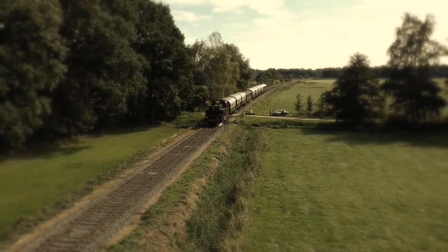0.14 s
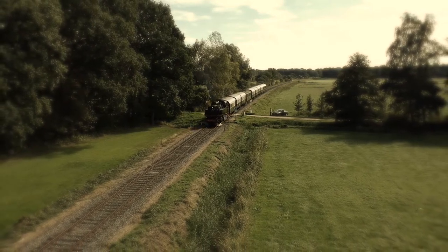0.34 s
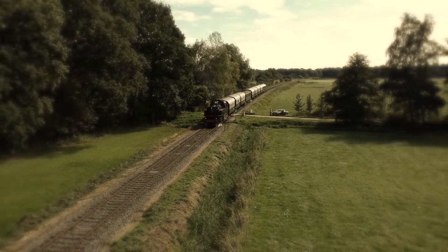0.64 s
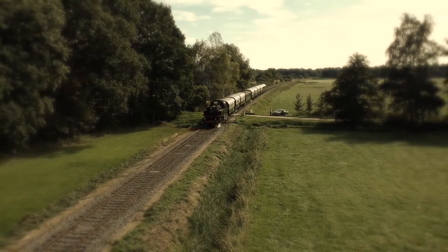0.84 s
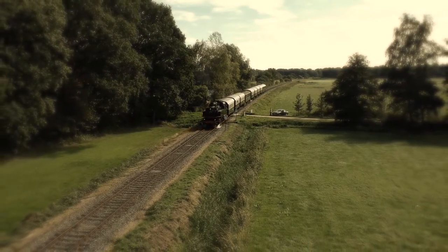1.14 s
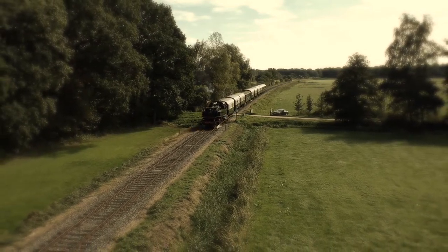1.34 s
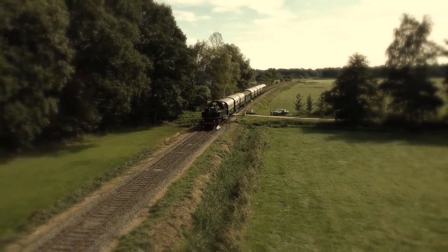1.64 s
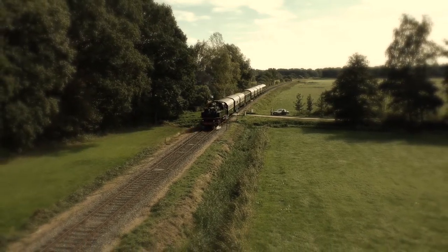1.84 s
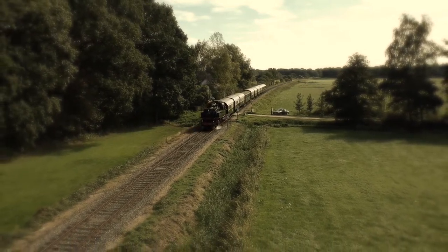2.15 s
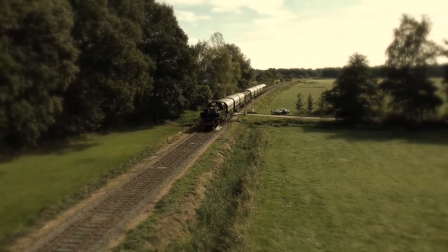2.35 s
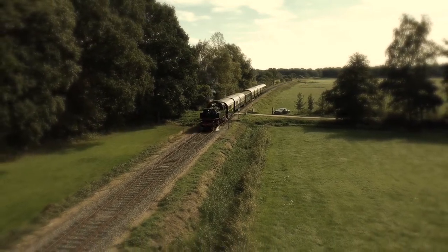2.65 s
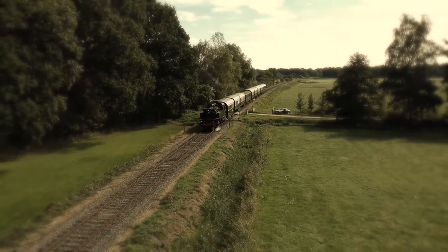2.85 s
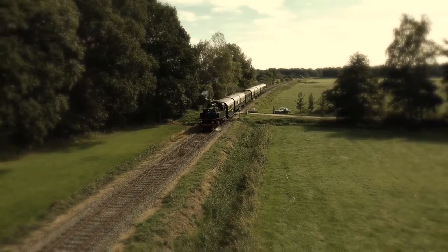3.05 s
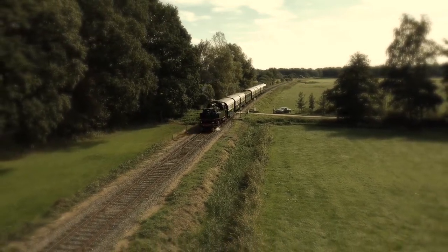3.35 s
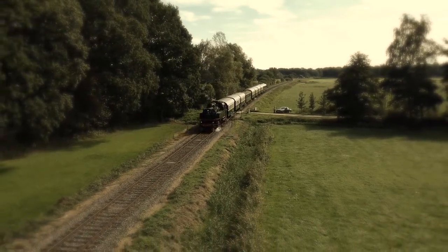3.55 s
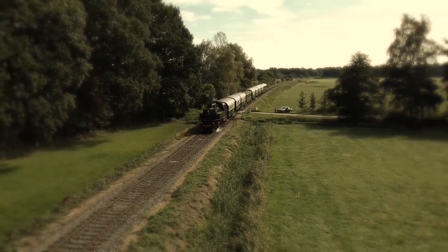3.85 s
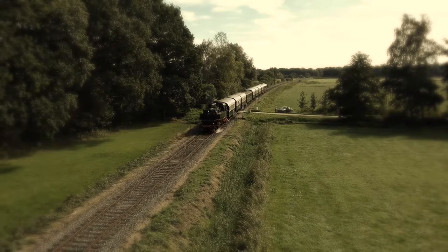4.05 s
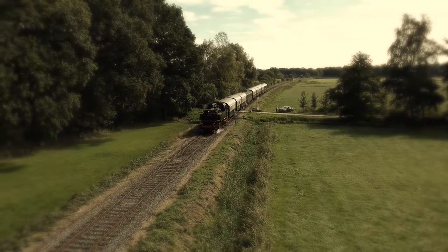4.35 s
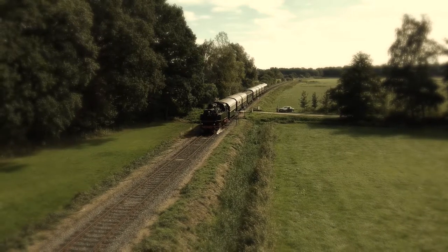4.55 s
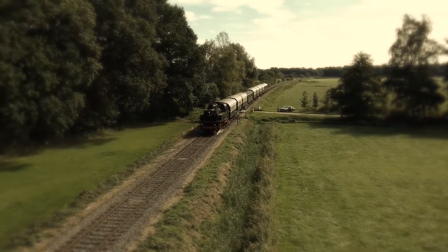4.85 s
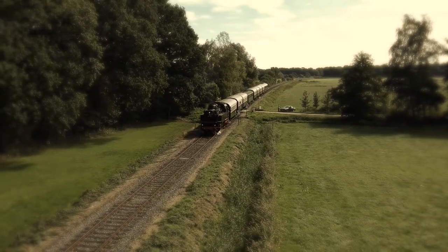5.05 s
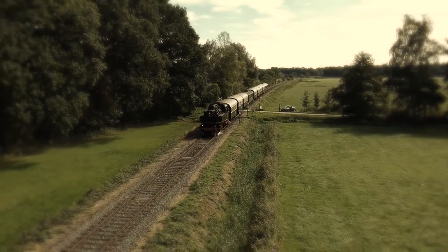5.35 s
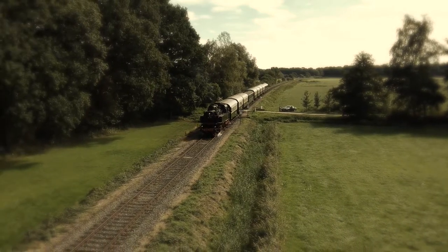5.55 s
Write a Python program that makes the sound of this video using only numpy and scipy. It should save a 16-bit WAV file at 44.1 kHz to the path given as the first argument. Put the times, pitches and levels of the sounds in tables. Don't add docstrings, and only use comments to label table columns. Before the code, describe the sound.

Steam engine already at speed from the start, outdoors with no room echo. Fast exhaust beats, slightly uneven in strength, ride over continuous airy hiss and low uneven rumble. The engine gradually grows fuller and closer over several seconds, with faint metallic wheel ringing. Stereo is wide, the left side later and duller; a phasey sweep resets abruptly near the end.

```python
import sys
import numpy as np
from scipy import signal
from scipy.fft import rfft, irfft, next_fast_len
from scipy.io import wavfile
from scipy.ndimage import uniform_filter1d, map_coordinates

SR = 44100
rng = np.random.default_rng(int(sys.argv[2]) if len(sys.argv) > 2 else 0)


def ratio_of_db(decibels):
    return 10 ** (np.asarray(decibels, float) / 20)


def dump(signal):
    limited = np.clip(np.atleast_2d(signal).T, -1, 1)
    pcm = np.round(limited * 32767).astype(np.int16)
    wavfile.write(sys.argv[1], SR, pcm)


N = 251811
T = np.arange(N) / SR

# time in seconds, nearness in dB, depth of the exhaust in dB,
# boom left minus right in dB, bark left minus right in dB.
COURSE = [(0.0, -3.5, -5, 12, -2.5), (0.45, -3, 0.5, 0, -10), (0.8, -2.5, -3.5, 0.5, -5.5),
          (1.3, -1, -9.5, 11, -6), (1.7, -1.3, -0.5, 6, -6), (2.3, 1.4, -5, 5, -5), (2.8, 0.7, 6, 2.5, -5),
          (3.3, 1.45, 5.5, -2.5, -7), (3.9, -0.2, 8, -1, -7.5), (4.4, 1.4, 6, -5.5, -8.5),
          (5.0, 3.5, 6, -5, -7.5), (5.3, 3, -2, -9, -2), (5.71, 2.5, -12, -1, -7)]


def chimney():
    # frequency in Hz, level in dB per Hz.
    boom_tone = [(50, -49), (80, 2), (105, -16), (122, 3), (140, 0), (165, -2.5), (200, -7.5), (260, -24)]
    bark_tone = [(150, -10), (220, -7), (300, 3), (360, -3), (430, 0.5), (520, -4), (600, -8), (800, -27)]
    roar_tone = [(450, -1), (600, 1.5), (900, 1.5), (1200, -3.5), (1500, -8), (1900, -25.5)]
    rasp_tone = [(1100, -47), (1500, 0.5), (2300, 1.5), (3300, -5), (4500, -4), (7000, -48)]
    # time in seconds, centre in Hz, level in dB, length in
    # seconds.
    spurts = [(0.615, 2300, -42, 0.025), (0.79, 2300, -38, 0.025), (1.285, 2250, -34, 0.03),
              (1.435, 2300, -34, 0.022), (2.33, 1750, -35, 0.019), (4.256, 1550, -35.5, 0.044),
              (4.9, 1700, -37, 0.045), (4.632, 13000, -35, .002)]
    flutter = flicker(45, 2.05)
    layers = []
    for layer, tone in enumerate((boom_tone, bark_tone, roar_tone, rasp_tone)):
        layers.append(puffs(layer) * colour(noise(), tone))
    boom, *upper = layers
    body = flutter * patchy(sum(upper), [451, 850, 1493, 2510], 30, 1.54)
    for s, hz, db, length in spurts:
        band = signal.butter(2, [hz / 1.24, hz * 1.21], "band", fs=SR)
        spurt = signal.lfilter(*band, noise())
        body = body + ratio_of_db(db) * np.exp(-((T - s) / length) ** 2) * spurt / np.std(spurt)
    return boom, body


def puffs(layer, extra_db=0):
    # delay, rise and fall in seconds.
    shapes = [(-0.00026, 0.015, 0.032), (-0.018, 0.015, 0.052), (-0.011, 0.017, 0.035),
              (-0.014, 0.014, 0.047), (-0.0088, 0.029, 0.029)]
    # level in dB of blasts 1, 2, 3 and 4.
    voices = [(-23, -23.5, -23.5, -28), (-26, -26.5, -27, -25.5), (-28, -28, -29, -28.5),
              (-33, -34.5, -35.5, -37), (-20, -23, -24.5, -28.5)]
    # dB per dB of strength, of nearness and of depth.
    answers = [(0.5, 0.4, 1), (0.98, 0.26, 0.1149), (1, -0.23, -0.03), (0.72, -0.1, 0.11),
               (-0.11, 0.85, -0.21)]
    tail_db, tail_s = -10, 0.02
    delay, rise, fall = shapes[layer]
    times, beat, strength = blasts()
    nearness, depth = curves(COURSE, times)[:2]
    answer_db = np.dot(answers[layer], [strength, nearness, depth])
    levels_db = extra_db + np.array(voices[layer])[beat] + answer_db
    power = np.zeros(N)
    for s, db in zip(times, levels_db):
        around = slice(max(int((s - .12) * SR), 0), max(int((s + .3) * SR), 0))
        u = T[around] - s - delay
        swell = np.exp(-(u / np.where(u < 0, rise, fall)) ** 2)
        tail = ratio_of_db(2 * tail_db) * (u > 0) * u / tail_s * np.exp(1 - np.abs(u) / tail_s)
        power[around] += ratio_of_db(2 * db) * (swell + tail)
    return np.sqrt(power)


def blasts():
    # start in seconds, strength in dB of blasts 1, 2, 3 and 4.
    turns = [(-0.362, 3, 0.1, -5.5, -7.5), (0.302, -3, -2.5, -1, -4), (0.964, 0, -2.5, 0.7, -1.3),
             (1.621, 0.1, -0.3, 0.1, -3), (2.281, 0.5, -0.3, -1, -1.6), (2.922, -1, -1.5, 0.4, -0.2),
             (3.568, 1, -1.6, 1, -2), (4.212, 3, 0.4, 1.3, -0.4), (4.846, 1.8, 1.6, 2.1, 1.4),
             (5.496, 1.5, 1.5, 0.1, 0.1)]
    beats = np.array([0, .26, .494, .74])
    start, *strength = np.transpose(turns)
    length = np.diff(start)
    length = np.append(length, length[-1])
    times = start[:, None] + length[:, None] * np.array(beats)
    return times.ravel(), np.tile(np.arange(4), len(start)), np.transpose(strength).ravel()


def jets(main, far_db, share=0.32):
    # frequency in Hz, level in dB per Hz.
    tones = [
        [(2500, -16), (3500, -9.5), (5000, -10), (7000, -5), (9000, 1.5), (11000, -1), (13000, -6.5), (15500, -24)],
        [(2500, -14), (3500, -13), (5000, -6), (6500, -1), (7800, 2.5), (9500, -1), (12000, -9), (15500, -22.5)],
    ]
    # dB on blasts 1, 2, 3 and 4.
    jet_extra = [(0.1, 0.1, -3, 3), (-0.5, 2.5, 0.5, 0), (-2.5, -1, -0.7, 2), (0.1, 0.8, -1.5, 3),
                 (0, -0.6, 2.5, 1.5), (-1.8, 0.5, 1.5, 5.3), (-2, 1, 1.5, 2), (-0.5, 3.2, 2, 1),
                 (1.3, 0, -1, 4), (-2.5, -1.3, 0.1, 0.1)]
    common, spit = noise(), flicker(45, 1.5)
    burst = ratio_of_db(-0.5) * puffs(layer=4, extra_db=np.ravel(jet_extra))
    right_db, left_db = lull(row=1), lull(row=2)
    left_push = late(spit * np.hypot(ratio_of_db(left_db), ratio_of_db(far_db) * burst), main)
    right_push = spit * np.hypot(ratio_of_db(right_db), burst)
    sides = []
    for shared, push, tone in zip((late(common, main), common), (left_push, right_push), tones):
        steam = colour(np.sqrt(share) * shared + np.sqrt(1 - share) * noise(), tone)
        sides.append(push * patchy(steam, [5000, 7500, 10500], 40, 1.17))
    return np.array(sides)


def motion():
    # frequency in Hz, level in dB per Hz.
    gear_tone = [(150, 41), (220, -26), (300, -1), (480, -0.5), (720, 3), (1000, 11.5), (1400, 5.5),
                 (2200, 6), (3300, -1), (5000, -52)]
    # frequency in Hz, width in Hz, level in dB.
    rims = [(300, 25, -48), (1175, 25, -63), (1510, 20, -64), (1962, 20, -64), (2260, 20, -59),
            (3316, 14, -58)]
    rolling = ratio_of_db(lull(row=0)) * patchy(colour(noise(), gear_tone), [500, 1500], 16, 2.6)
    approach = ratio_of_db(1.5 * (T - 3))
    for hz, width, db in rims:
        ring = signal.lfilter(*signal.iirpeak(hz, hz / width, SR), noise())
        rolling = rolling + approach * ratio_of_db(db) * ring / np.std(ring)
    return rolling


def lull(row):
    # dB after blasts 1, 2, 3 and 4, dB per dB of nearness.
    lulls = [(-31, -40, -32, -35.5, 1.7), (-28.5, -26.5, -27, -26.5, 0.99), (-45.5, -45, -42.5, -42.5, 1)]
    after_s = 0.077
    times, beat, _ = blasts()
    *pattern, near = lulls[row]
    return np.interp(T, times + after_s, np.array(pattern)[beat]) + near * curves(COURSE)[0]


def rumble():
    # time in seconds, left level in dB, right level in dB.
    passing = [(0.0, -21.5, -35), (0.3, -28, -28), (0.86, -22, -28.5), (1.1, -24, -23),
               (1.45, -24.5, -23.5), (1.85, -24, -28), (2.25, -23, -18), (2.8, -14.5, -25),
               (3.05, -23, -24.5), (3.4, -25, -22), (3.8, -18.5, -21), (4.05, -27, -24),
               (4.5, -22.5, -18.5), (4.95, -21, -21.5), (5.3, -20, -15.5), (5.71, -18, -26)]
    # frequency in Hz, level in dB per Hz.
    grounds = [
        [(18, -55), (30, -35), (43, -9), (65, -1.5), (90, -4.5), (122, 2.5), (165, -10), (200, -11.5), (300, -24)],
        [(18, -55), (30, -35), (43, -1), (70, 9), (100, 6), (150, -3.5), (190, -3.5), (240, -29.5), (350, -42)],
    ]
    shake_db = 24.5
    lumps = np.hypot(1, ratio_of_db(shake_db) * puffs(layer=2))
    sides = []
    for db, tone in zip(curves(passing), grounds):
        swell = flicker(5.64, 1) * flicker(9.8, 2.6)
        sides.append(ratio_of_db(db - 4.5) * lumps * swell * colour(noise(), tone))
    return np.array(sides)


def noise():
    return rng.standard_normal(N)


def curves(table, t=T):
    s, *columns = np.transpose(table)
    return [np.interp(t, s, c) for c in columns]


def colour(x, points):
    size = next_fast_len(N)
    hz, db = np.transpose(points)
    bins_hz = np.arange(size // 2 + 1) * SR / size
    gain = ratio_of_db(np.interp(np.log(bins_hz + 1), np.log(hz), db, -90, -90))
    y = irfft(rfft(x, size) * gain, size)[:N]
    return y / np.sqrt(np.mean(y ** 2))


def flicker(rate, depth_db):
    k = int(SR / rate)
    held = np.repeat(rng.standard_normal(N // k + 1), k)
    slewed = uniform_filter1d(uniform_filter1d(held, k), k)
    return ratio_of_db(depth_db * slewed[:N])


def patchy(x, edges_hz, rate, depth_db):
    size = next_fast_len(N)
    band = np.digitize(np.arange(size // 2 + 1) * SR / size, edges_hz)
    spectrum = rfft(x, size)
    bands = [irfft(spectrum * (band == k), size)[:N] for k in range(len(edges_hz) + 1)]
    return sum(y * flicker(rate, depth_db) for y in bands)


def late(x, ms):
    return map_coordinates(x, [np.arange(N) - ms * SR / 1000], order=3, mode="reflect")


def capsule(x, hz):
    return signal.lfilter(*signal.bilinear([1, -2 * np.pi * hz], [1, 2 * np.pi * hz], SR), x)


def scene():
    # time in seconds, left main after right main in ms, right second before its main
    # in ms, left second after its main in ms.
    lags = [(0, 17.32, 1.42, 1.43), (.62, 17.35, 1.16, 1.59), (1.13, 17.32, .86, 1.72),
            (1.62, 17.23, .59, 1.88), (2.11, 17.19, .2, 2.11), (2.6, 17.17, -.23, 2.4),
            (3.09, 17.03, -.75, 2.68), (3.57, 16.94, -1.36, 2.99), (4.05, 16.76, -2.42, 3.47),
            (4.53, 16.49, -3.55, 4.08), (5.085, 15.93, -5.0, 5.0), (5.09, 17.37, 1.42, 1.43),
            (5.71, 17.35, 1.2, 1.57)]
    main, early, second = curves(lags)
    boom_db, body_db = curves(COURSE)[2:]
    boom, body = chimney()
    distance = signal.butter(1, 2500, fs=SR)
    near = boom + body
    far = ratio_of_db(boom_db) * boom + ratio_of_db(body_db) * signal.lfilter(*distance, body)
    thin = signal.butter(1, [250, 5000], "band", fs=SR)
    dull = signal.butter(1, 5000, fs=SR)
    left_second = ratio_of_db(-4.5) * signal.filtfilt(*thin, far)
    right_second = ratio_of_db(-3.8 - .6 * T) * signal.filtfilt(*dull, near)
    left = late(capsule(far, 150), main) - late(left_second, main + second)
    right = capsule(near, 420) - late(right_second, -early)
    gear = [late(ratio_of_db(body_db - 4.0) * motion(), main), motion()]
    return ratio_of_db(1.2) * np.array([left, right]) + gear + jets(main, far_db=-11) + rumble()


def top_cut(x):
    return signal.sosfilt(signal.butter(12, 15840, fs=SR, output="sos"), x)


def record(dry):
    rounded = .9 * np.tanh(dry / .9)
    return top_cut(rounded)


dry = scene()
out = record(dry)
dump(out)
```